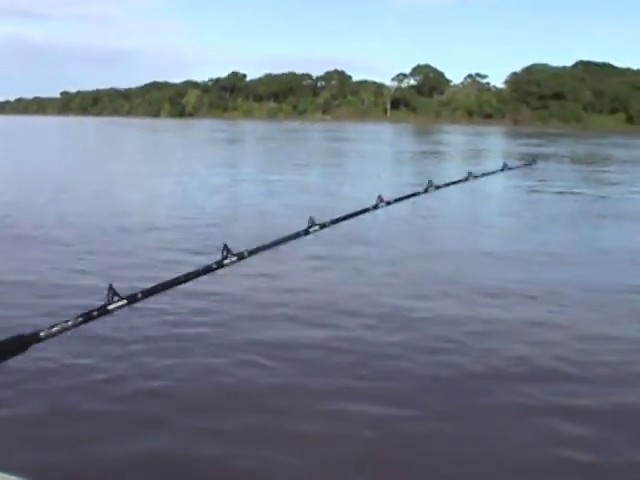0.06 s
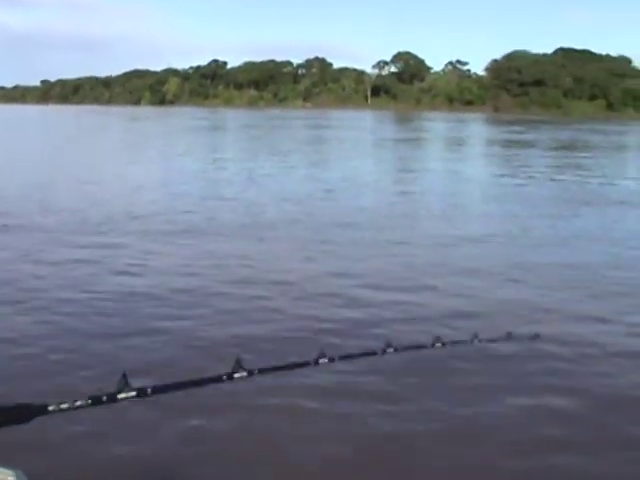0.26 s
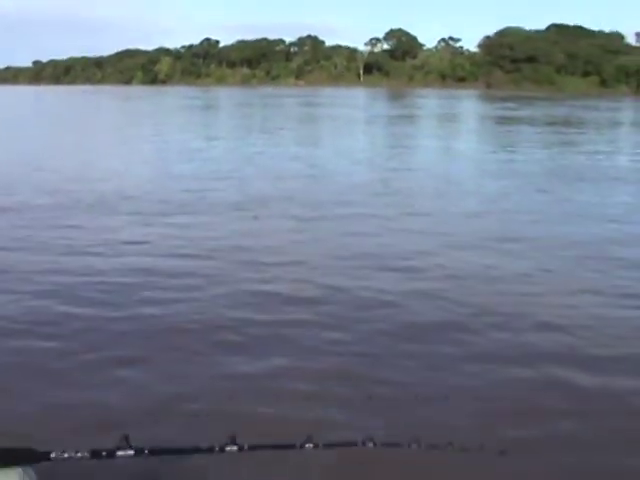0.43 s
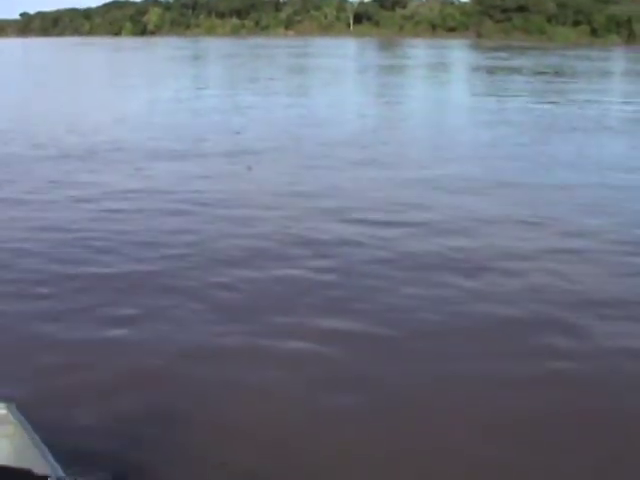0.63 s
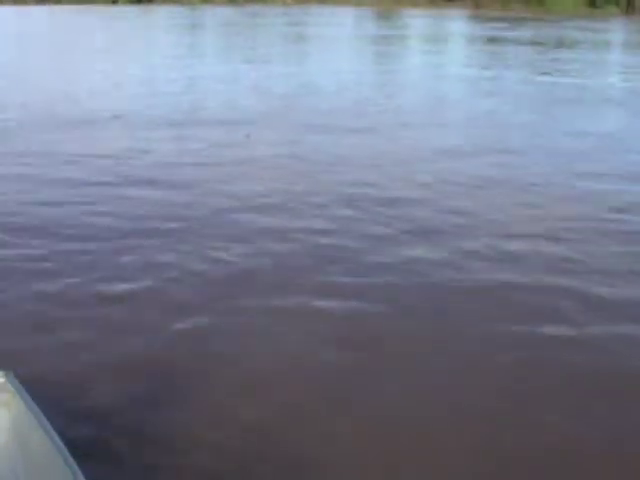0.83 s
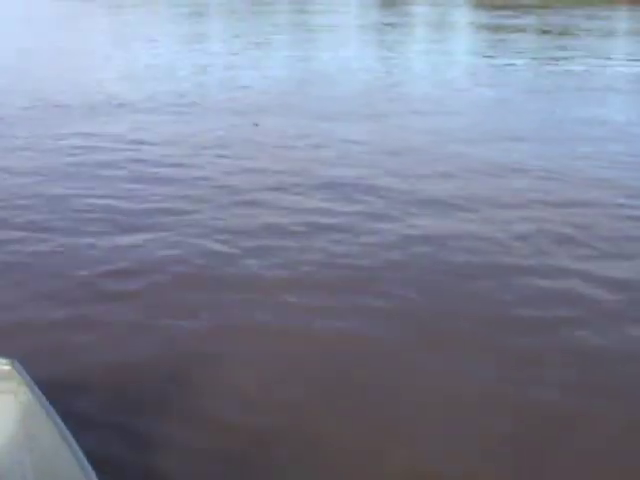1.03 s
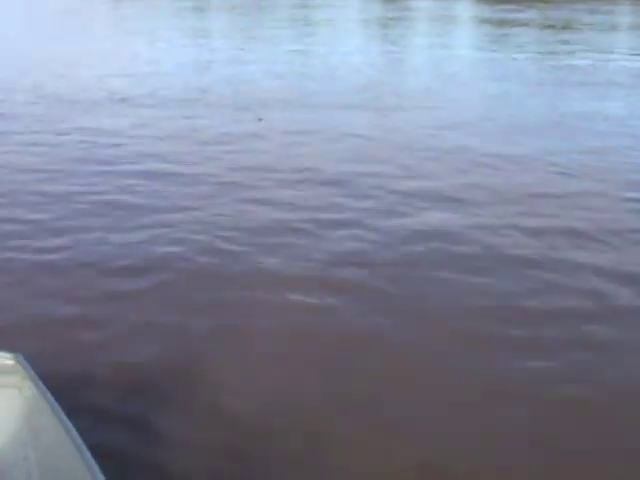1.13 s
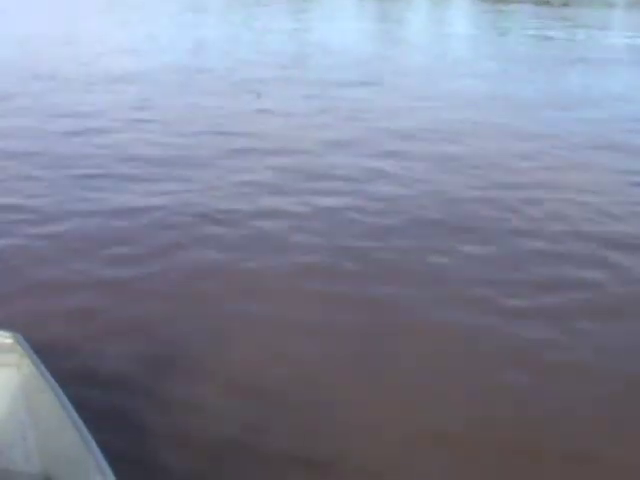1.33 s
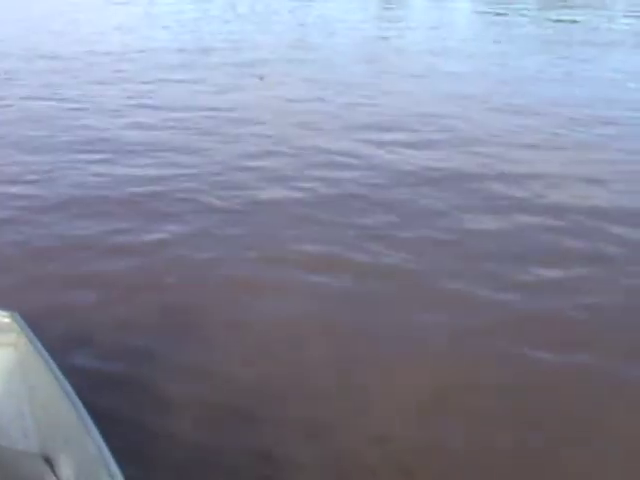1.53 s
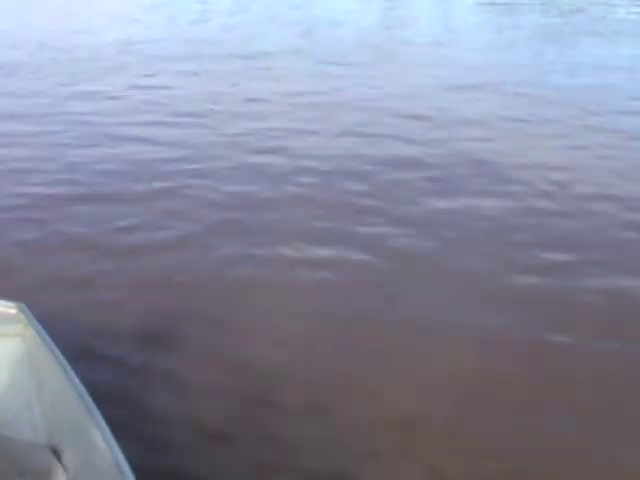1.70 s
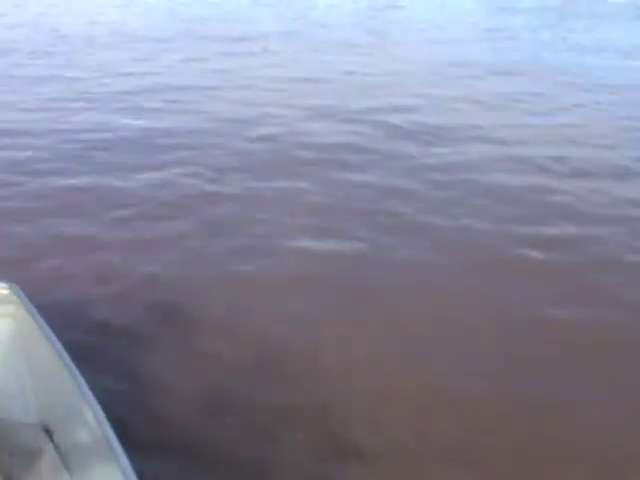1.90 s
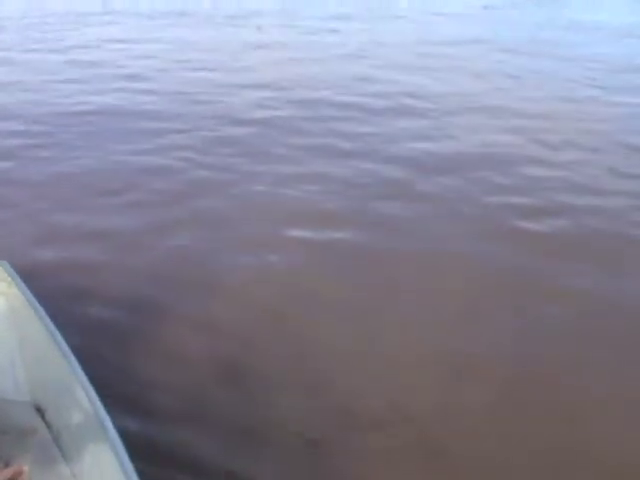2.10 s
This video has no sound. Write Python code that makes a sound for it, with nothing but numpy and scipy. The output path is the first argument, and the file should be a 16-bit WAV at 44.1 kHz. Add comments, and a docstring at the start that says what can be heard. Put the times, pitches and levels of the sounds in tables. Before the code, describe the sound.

A fishing reel's drag dominates, close and slightly left. After a tiny bird chirp and soft water wash over faint low hum, it buzzes from 0.2 to 1.0 seconds in fast, uneven metallic surges. Single clicks continue to 1.3, with a brief falling squeak, then a sharp clack at 1.4 leaves a thin high ring. Quiet water puffs, faint knocks and distant chirps follow until about 2.1.

```python
"""A bird chirps once over a low hum and water washing along the hull of a boat on a river.
A reel buzzes as a hooked fish pulls line in surges: the drag's pawl snaps over its teeth, slows to single
clicks with a falling squeak, and stops with a clack of the tackle that leaves a thin metal ring.
Soft water puffs follow, and the far bird chirps on. Snaps and knocks are noise bursts that excite decaying
modes; water, squeak and puffs are filtered noise; hum, ring and chirps are sine tones that waver."""
import sys
import numpy as np
from scipy import signal
from scipy.fft import rfft, irfft
from scipy.io import wavfile

SR = 44100
rng = np.random.default_rng(int(sys.argv[2]) if len(sys.argv) > 2 else 0)


def wrap_up_sound(samples):
    """Save the sound to the file named by the first command line argument, as 16-bit audio."""
    columns = np.atleast_2d(samples).T
    # keep every value between -1 and 1, then stretch to whole-number steps
    tamed = np.clip(columns, -1, 1)
    steps = np.round(tamed * 32767).astype(np.int16)
    wavfile.write(sys.argv[1], SR, steps)


N = 94815
TIME = np.arange(N) / SR


def amp(db):
    """Amplitude ratio of a level in decibels."""
    return 10 ** (np.asarray(db) / 20)


def evened(x):
    """Scales a signal to unit root mean square."""
    return x / np.sqrt(np.mean(x ** 2) + 1e-20)


def read(points, hz):
    """Interpolates a spectrum along a logarithmic frequency axis."""
    f, value = np.transpose(points)
    return np.interp(np.log(hz + 1), np.log(f + 1), value)


def add(mix, s, sound):
    """Superposition: mixes a sound in at time s, trimmed to the mix."""
    at = round(s * SR)
    sound = sound[..., max(-at, 0):]
    part = mix[..., max(at, 0):][..., :sound.shape[-1]]
    part += sound[..., :part.shape[-1]]


def wander(hz):
    """Slow random fluctuation: noise under a Gaussian low-pass, with unit root mean square."""
    spectrum = rfft(rng.standard_normal(N))
    low_pass = np.exp(-(np.fft.rfftfreq(N, 1 / SR) / hz) ** 2)
    return evened(irfft(spectrum * low_pass, N))


def pair(same):
    """Partly coherent white noise for two ears, from a common and an opposed component."""
    a, b = rfft(rng.standard_normal((2, N)))
    likeness = np.clip(read(same, np.fft.rfftfreq(N, 1 / SR)), -1, 1)
    mid = a * np.sqrt((1 + likeness) / 2)
    side = b * np.sqrt((1 - likeness) / 2)
    return irfft(np.array([mid + side, mid - side]), N)


def coloured(x, points, power=1, size=4096):
    """Minimum-phase filtering: a causal response whose phase follows from its log magnitude."""
    log_gain = power * np.log(amp(read(points, abs(np.fft.fftfreq(size, 1 / SR)))))
    taps = np.fft.ifft(np.exp(np.conj(signal.hilbert(log_gain)))).real[:size // 2]
    return signal.fftconvolve(x, np.atleast_2d(taps) if x.ndim > 1 else taps)[..., :N]


def hum():
    """Random modulation: low tones waver in phase and strength."""
    # low partials of the hum (frequency [Hz], mid level [dB])
    partials = [(36, -71), (60, -74.5), (84, -65), (210, -73.5)]
    out = np.zeros(N)
    for hz, db in partials:
        phase = 2 * np.pi * (hz * TIME + rng.random()) + wander(2.3)
        out += amp(db + 1.5 * wander(9)) * np.sqrt(2) * np.sin(phase)
    return out


def gurgling(x):
    """Time-frequency modulation: small patches of the wash are raised and lowered at random."""
    depth_db, width_hz, width_s = 2.5, 43.7, 0.025
    hz, s, z = signal.stft(x, SR, nperseg=1024, noverlap=768)
    blur_hz = np.exp(-((hz - hz.mean()) / width_hz) ** 2)
    blur_s = np.exp(-((s - s.mean()) / width_s) ** 2)
    blur = np.outer(blur_hz, blur_s)
    patches = evened(signal.fftconvolve(rng.standard_normal(blur.shape), blur, "same"))
    z = z * evened(amp(depth_db * np.clip(patches, -2, 2)))
    return signal.istft(z, SR, nperseg=1024, noverlap=768)[1][:, :N]


def river():
    """Turbulent flow as broadband noise: a restless wash with finer hiss above it."""
    # spectrum of the flowing water (frequency [Hz], relative density [dB per Hz])
    water_colour = [(30, -22), (60, -13.5), (250, -8), (330, 0), (520, -7), (640, -3.5), (850, -2.5),
                    (1500, -9), (1950, -7.5), (3500, -12), (5500, -16), (16000, -23.5)]
    # likeness of the water at the two ears (frequency [Hz], coherence [-1 to 1])
    water_likeness = [(60, 0.72), (640, 0.5), (1400, 0.31)]
    # swell of the water (time [s], gain of the wash [dB], gain of the hiss [dB])
    swell = [(0, -46.5, -51), (.17, -62, -57), (.3, -53, -62), (.7, -50, -46.5), (1.15, -60, -53.5),
             (1.36, -51, -52.5), (1.83, -53, -55), (1.96, -60.5, -56.5), (2.12, -56.5, -53.5)]
    noise = evened(coloured(pair(water_likeness), water_colour))
    s, wash_db, hiss_db = np.transpose(swell)
    low = signal.sosfiltfilt(signal.butter(2, 1500, fs=SR, output="sos"), noise)
    wash_gain = amp(np.interp(TIME, s, wash_db) + 1.83 * wander(20))
    hiss_gain = amp(np.interp(TIME, s, hiss_db) + 0.95 * wander(48))
    return gurgling(low) * wash_gain + (noise - low) * hiss_gain


def squeak_and_water_puffs():
    """Narrow-band noise on a gliding carrier: a falling squeak as the reel slows, then soft water puffs."""
    # squeak, gurgle and splash (time [s], start frequency [Hz], glide [octaves/s], length [s], level [dB])
    glides = [(1.304, 1480, -11, 0.037, -46.5), (1.493, 350, 4, 0.029, -56.5),
              (1.726, 2500, 48, 0.011, -48.5)]
    relative_width = .12  # bandwidth as a share of the start frequency
    out = np.zeros(N)
    for s, hz, glide, length, db in glides:
        age = np.maximum(TIME - s, 0)
        u = 2 * age / length
        turns = np.cumsum(hz * 2 ** (glide * np.minimum(age, 2 * length))) / SR
        envelope = wander(hz * relative_width) + 1j * wander(hz * relative_width)
        band = envelope * np.exp(2j * np.pi * turns)
        out += amp(db) * u * np.exp(1 - u) * band.real  # strongest at half the length
    return out


def bird():
    """Frequency modulation: far chirps rise a little, fall further, and jitter slightly hoarsely."""
    # chirps (time [s], length [s], crest frequency before jitter [Hz], peak level [dB])
    calls = [(-.012, .03, 4400, -53), (1.589, 0.039, 4170, -58.5), (1.741, 0.038, 3820, -55),
             (1.912, 0.048, 3530, -54.5), (2.1, 0.042, 3400, -53.5)]
    bend, crest = .36, .35  # curvature of the pitch arch, and its top as a share of the length
    out, waver = np.zeros(N), wander(223)
    for s, length, top_hz, db in calls:
        u = np.clip((TIME - s) / length, 0, 1)
        hz = top_hz * (1 - bend * (u - crest) ** 2 + 0.029 * waver)
        out += amp(db) * np.sin(np.pi * u ** 1.8) * np.sin(2 * np.pi * np.cumsum(hz) / SR)
    return out


def snaps(rows):
    """Impact noise: each blow is a short scrape, a burst of chatter and a loose, lumpy rattle, then its echo."""
    # likeness of the reel's noise at the two ears (frequency [Hz], coherence [-1 to 1])
    reel_likeness = [(200, 0.27), (3200, 0.99), (7000, 0.73), (15000, 0.8)]
    scrape_share, scrape_db = 0.28, 1.5  # the pawl rides up a tooth, then snaps down
    rattle_s, rattle_db, lumps_db = 0.011, -19, 9.5
    patchy_db = 1.47  # every snap has its own colour
    bounce_s, bounce_db, bounce_spread = 0.0046, -12, 0.22  # echo off the side of the boat
    lead = 200  # samples ahead of the snap, for the scrape
    t = np.arange(-lead, SR // 10) / SR
    before, after = np.minimum(t, 0), np.maximum(t, 0)
    out, noise, lumps = np.zeros((2, N)), pair(reel_likeness), wander(400)
    for s, db, length in rows:
        part = rng.integers(N - len(t)) + np.arange(len(t))
        scrape = amp(scrape_db) * np.exp(before / (scrape_share * length))
        chatter = np.exp(-after / length)
        rattle_gain = amp(rattle_db + lumps_db * np.tanh(lumps[part]))
        rattle = (t > 0) * rattle_gain * np.exp(-after / rattle_s)
        shape = np.hypot(np.where(t < 0, scrape, chatter), rattle)
        burst = rfft(shape * noise[:, part])
        patches = signal.resample(rng.standard_normal(size=20), burst.shape[1])
        burst = irfft(burst * amp(patchy_db * patches), len(t))
        # the left ear's energy is set by the envelope, not by chance
        blow = 0.61 * amp(db) * burst * np.linalg.norm(shape) / np.linalg.norm(burst[0])
        delay = bounce_s * (1 + bounce_spread * rng.standard_normal())
        add(out, s - lead / SR, blow)
        add(out, s - lead / SR + delay, amp(bounce_db) * blow)
    return out


def struck(rows, colour, modes, column):
    """Modal excitation: blows pass through a body and ring its modes, each time a little differently."""
    rise_s, detune_share, uneven_db = .0006, 0.01, 2  # modes swell quickly and vary from blow to blow
    out, t = coloured(snaps(rows), colour), TIME[:SR // 10]
    swell = 1 - np.exp(-t / rise_s)
    for s, db, _ in rows:
        for mode in modes:
            detune, uneven = rng.standard_normal(2)
            turns = mode[0] * (1 + detune_share * detune) * t + rng.random()
            level = amp(db + mode[column] + uneven_db * uneven - 60 * t / mode[1])
            add(out, s - rise_s, level * swell * np.sin(2 * np.pi * turns))
    return out


def clack():
    """Impact and free decay: the tackle knocks, and a small metal part rings on."""
    # knocks of the tackle (time [s], relative level [dB], decay to 1/e [s])
    knocks = [(1.329, -30.5, 0.0066), (1.3996, -24, .0018), (1.4014, -18, .001), (1.4042, -15, .0015),
              (1.476, -40.5, 0.0023), (1.727, -41, .004)]
    # spectrum of a knock (frequency [Hz], gain [dB])
    knock_colour = [(150, -25), (830, 1), (1250, -5.5), (1600, 0.5), (2400, 7), (3600, 0), (5000, -0.5),
                    (6500, -14), (8800, -5), (16000, -24)]
    # modes of the knocked tackle (frequency [Hz], t60 [s], level relative to the blow [dB])
    tackle_modes = [(796, 0.03, -17.5), (2242, 0.02, -4)]
    ring_s, ring_hz, ring_t60, ring_db, waver_rad = 1.4128, 7090, 0.16, -48.5, 0.41
    out = struck(knocks, knock_colour, tackle_modes, column=2)
    phase = 2 * np.pi * ring_hz * TIME + waver_rad * wander(150)
    add(out, ring_s, amp(ring_db - 60 * TIME / ring_t60) * np.sin(phase))
    return out


def rebounding(rows):
    """Secondary impact: after each snap the loose pawl ticks again, faintly, at a chance delay."""
    mean_delay_s, top_db, decay_s = .012, -16.5, 0.00074
    chance = rng.random((len(rows), 2))
    ticks = []
    for (s, db, _), (late, weak) in zip(rows, chance):
        ticks.append((s + mean_delay_s * (.5 + late), db + top_db - 10 * weak, decay_s))
    return rows + ticks


def drag():
    """Ratchet excitation: one snap for each tooth that passes the pawl, then the last single clicks."""
    # speed of the slipping spool (time [s], tooth rate [1/s])
    speed = [(0.185, 41.7), (0.242, 63.3), (0.277, 91.3), (0.354, 78.9), (0.409, 141.0), (0.432, 136.8),
             (0.473, 56.0), (0.52, 109.9), (0.541, 109.0), (0.589, 36.6), (0.649, 75.5), (0.685, 82.8),
             (0.734, 69.7), (0.767, 96.5), (0.806, 104.5), (0.868, 31.7), (0.906, 86.8), (0.927, 107.7),
             (1.009, 33.9)]
    # the pawl's snaps during the run (time [s], relative level [dB], gain of the top treble [dB])
    pull = [(.2, -24.5, -3), (.29, -22.5, -5.5), (.335, -21.5, -8), (.38, -22.5, -3), (.44, -23, .5),
            (.5, -19.5, -1), (.59, -23, 2), (.74, -22, -1.5), (.81, -23, 0), (.93, -19.5, -6),
            (1.01, -21.5, -0.5)]
    # single clicks as the spool slows (time [s], relative level [dB], decay to 1/e [s])
    clicks = [(1.0353, -20, 0.0024), (1.0655, -21, 0.0032), (1.0961, -21.5, 0.0023),
              (1.1322, -22.5, 0.0022), (1.1669, -22.5, 0.003), (1.1923, -22.5, 0.0034),
              (1.2139, -21.5, 0.0032), (1.2329, -22, 0.0033), (1.2496, -26.5, 0.0056),
              (1.2676, -24, 0.0025), (1.2873, -24.5, 0.0031), (1.3198, -22, 0.0027),
              (1.3866, -20.5, 0.0022)]
    # spectrum of a snap when running (frequency [Hz], gain [dB])
    run_colour = [(150, -38), (400, -26), (930, -5.5), (1200, -9.5), (1700, 1), (2600, 0), (4400, 2),
                  (6900, -5), (10300, 1), (11800, -8.5), (15000, -10), (16000, -28)]
    # spectrum of a single click (frequency [Hz], gain [dB])
    click_colour = [(400, -13.5), (900, -4.5), (1300, -13), (1750, 3.5), (2600, -1.5), (5400, 1.5),
                    (6800, -8.5), (8200, -3), (10500, -1.5), (11600, -12), (12600, -9.5), (16000, -20)]
    # modes of the reel (frequency [Hz], t60 [s], relative level running [dB], relative level ticking [dB])
    reel_modes = [(1973, 0.077, -24.5, -25), (2190, 0.041, -21.5, -23), (3235, 0.031, -7, -14),
                  (4020, 0.024, -49, -16), (4390, 0.0056, -7.5, -8), (8740, 0.013, -8.5, -11),
                  (14230, 0.012, -16.5, -27)]
    uneven_db, peak_lag_s, treble_hz = 0.76, 0.00037, 9900
    snap_s, snap_spread = 0.0028, 0.21  # median decay to 1/e, and its log spread
    teeth = np.cumsum(np.interp(TIME, *np.transpose(speed), left=0, right=0)) / SR
    at = TIME[1:][np.diff(np.floor(teeth)) > 0] - peak_lag_s
    s, pull_db, treble_db = np.transpose(pull)
    db = np.interp(at, s, pull_db) + uneven_db * rng.standard_normal(len(at))
    length = snap_s * np.exp(snap_spread * rng.standard_normal(len(at)))
    run = struck(rebounding(list(zip(at, db, length))), run_colour, reel_modes, column=2)
    high_pass = signal.butter(2, treble_hz, "high", fs=SR, output="sos")
    treble = signal.sosfiltfilt(high_pass, run)
    brightened = run + treble * (amp(np.interp(TIME, s, treble_db)) - 1)
    return brightened + struck(rebounding(clicks), click_colour, reel_modes, column=-1)


def scene():
    """Interaural level difference: the reel and tackle sit mostly to the left amid the river."""
    # tilt of the reel and tackle to the left (frequency [Hz], level difference before each ear's share [dB])
    reel_tilt = [(200, -1), (1300, 1.5), (3200, 3.5), (5200, 4.5), (7400, 4), (8700, 3), (11000, -2),
                 (12600, 11.5)]
    background = river() + squeak_and_water_puffs() + hum() + bird()
    left, right = drag() + clack()
    tackle = np.array([coloured(left, reel_tilt, power=0.66), coloured(right, reel_tilt, power=-0.2)])
    return background + tackle


def record(dry):
    """Band limitation: a linear-phase low-pass removes the highest treble."""
    edge_hz = 15900
    taps = signal.firwin(511, edge_hz, window=("kaiser", 9), fs=SR)
    return signal.oaconvolve(dry, taps[None], "same")


dry = scene()
out = record(dry)
wrap_up_sound(out)
```